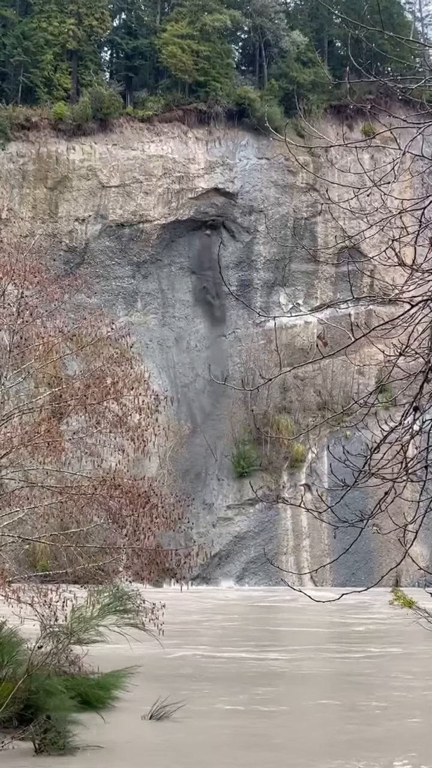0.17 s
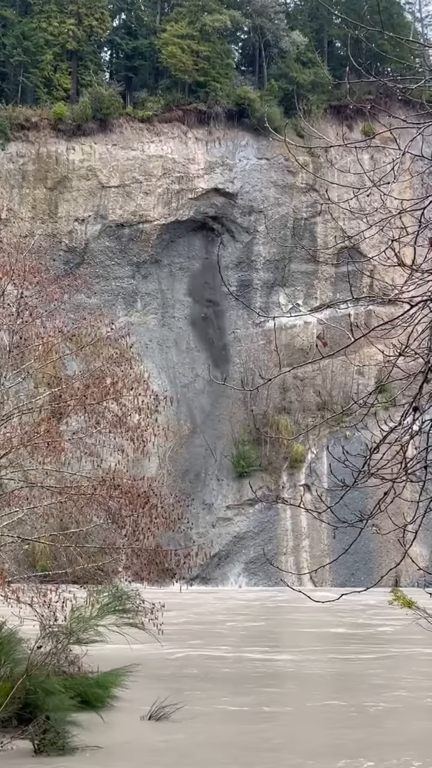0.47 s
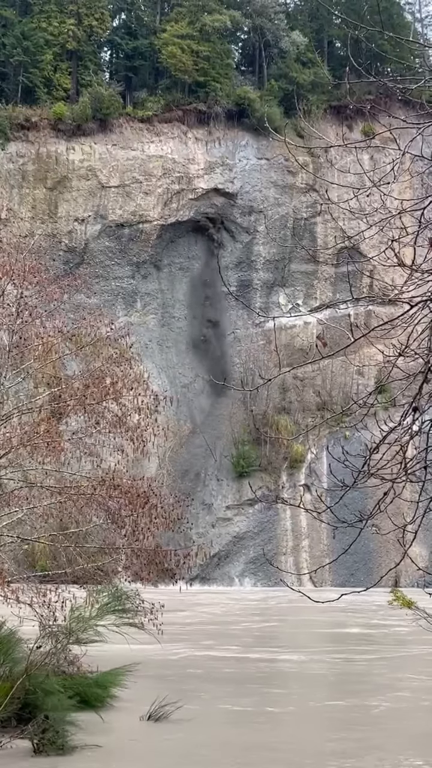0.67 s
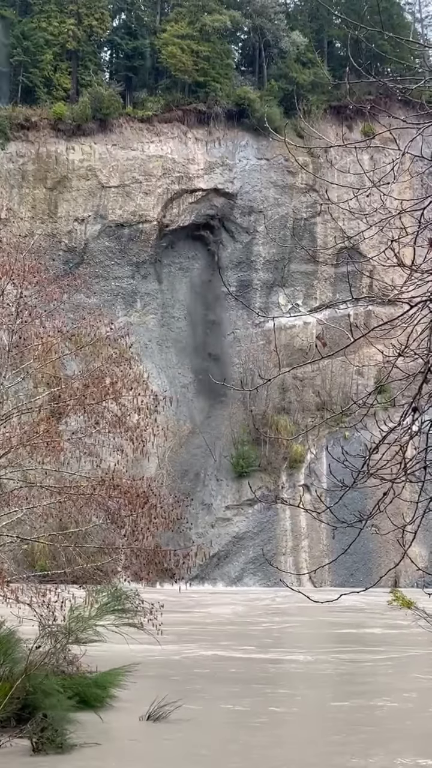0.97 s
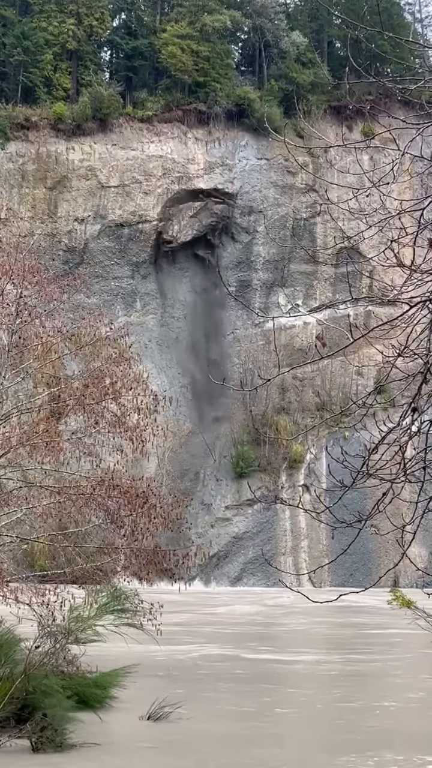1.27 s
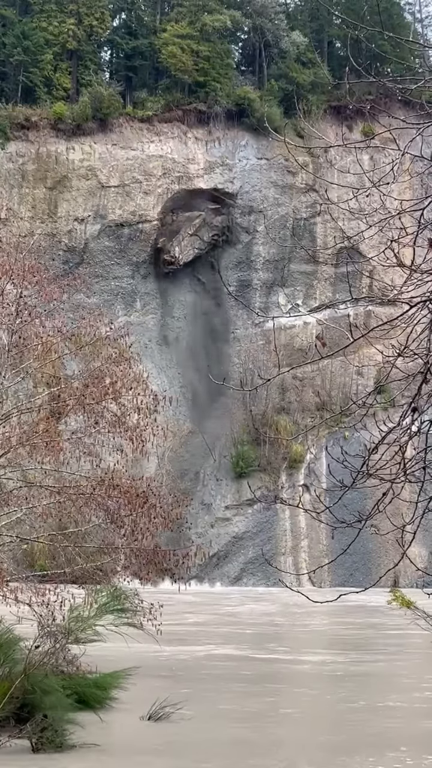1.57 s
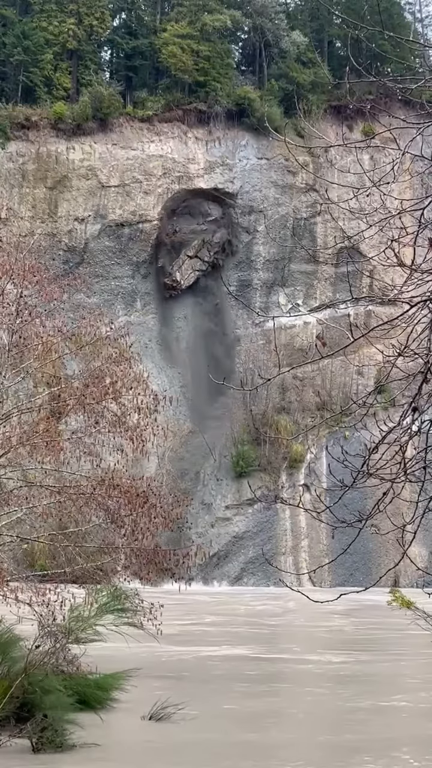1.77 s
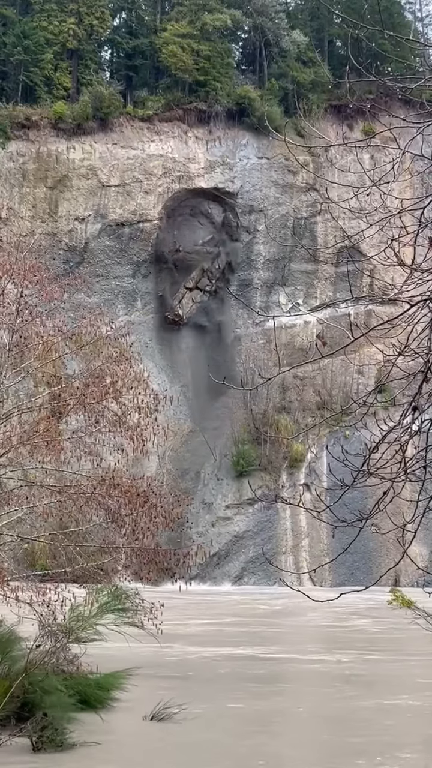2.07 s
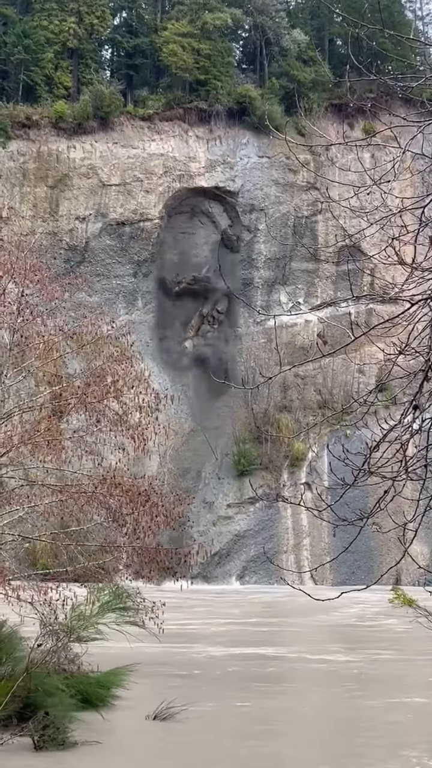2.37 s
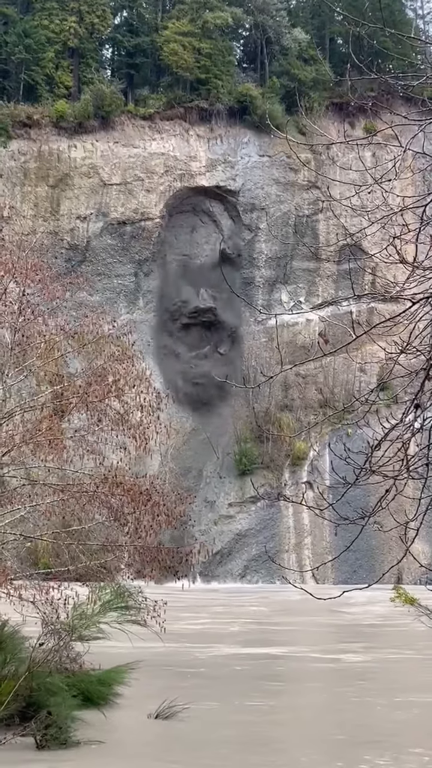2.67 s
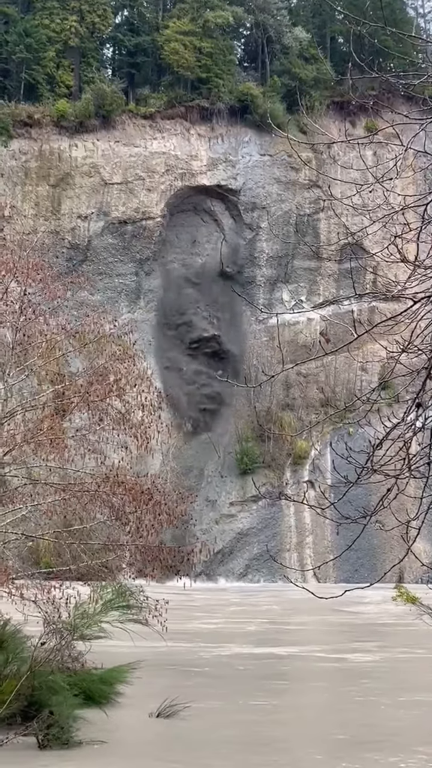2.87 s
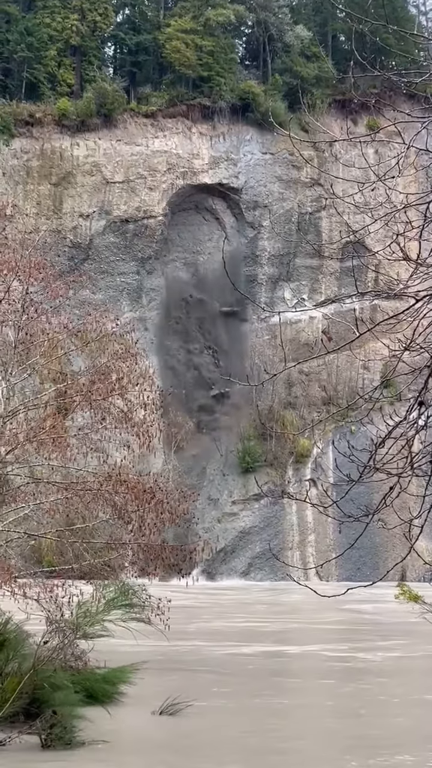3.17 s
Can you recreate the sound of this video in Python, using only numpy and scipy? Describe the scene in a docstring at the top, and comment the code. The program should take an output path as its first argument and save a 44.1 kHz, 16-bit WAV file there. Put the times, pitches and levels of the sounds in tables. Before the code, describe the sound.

A landslide on a gravel cliff, heard from the far bank: single stones clack over steady river rush, dull thuds follow at one second, then crumbling gravel and deep rumble grow until the end.

```python
"""Single stones clack over the rush of a wide river; then a slab breaks out of the gravel cliff.
It lets go with dull thuds, then crumbles into a growing rush of gravel with a deep rumble.
Heard from the far bank. River, gravel bed, grit, clods and rumble are noise shaped by spectra,
pebbles are tiny decaying rings, thuds are sagging low sines, and stones are clicks with noisy chips."""
import sys
import numpy as np
from scipy import signal
from scipy.fft import rfft, irfft
from scipy.io import wavfile
from scipy.ndimage import uniform_filter1d

SR = 44100
rng = np.random.default_rng(int(sys.argv[2]) if len(sys.argv) > 2 else 0)


def transcribe(u):
    """Save the signal u as a 16-bit wav file named by the first command-line argument.

    u: samples, shape (n,) or (channels, n), limited to [-1, 1]; the rate is SR.
    q: integer samples, one column per channel.
    """
    v = np.clip(np.atleast_2d(u).T, -1, 1)
    q = np.round(v * 32767).astype(np.int16)
    wavfile.write(sys.argv[1], SR, q)


N = 145971  # length in samples

# Spectra give relative density only: each coloured noise is brought to rms 1 before its level.
# River spectrum: frequency_hz, density_db (per Hz)
RIVER_SPECTRUM = [(20, -40), (45, -19), (75, 0.5), (140, -5), (270, -0.5), (600, -4.5), (950, -3.5),
                  (1400, -8), (2000, -9.5), (3200, -13.5), (5000, -17), (7000, -22), (10000, -32.5),
                  (14000, -40.5)]
RIVER_DB = -32.5

# Single stones striking: start_s, level_db (before the contact and chips trims), centre_hz, width_octaves
STONE_STRIKES = [(.157, -20, 1800, 1), (.166, -21.5, 2000, 0.77), (0.1743, -19.5, 2860, 0.71),
                 (0.285, -19, 1400, 0.94), (.301, -22, 1800, 0.84), (0.346, -23, 1600, 0.74),
                 (.506, -33, 4700, .3), (.602, -22, 3700, .3), (.611, -21, 3670, 0.45),
                 (.725, -22, 1890, 0.5), (0.7708, -31, 6500, 0.75), (0.773, -19, 3650, 0.6),
                 (1.028, -25, 1400, .9), (1.155, -21.5, 3400, 0.6), (1.186, -18, 2200, 0.57),
                 (1.206, -24, 4000, 0.83), (1.211, -18.5, 2400, 0.7), (1.269, -17, 2750, 0.4),
                 (1.271, -23, 2830, .55), (1.368, -23, 1800, 0.47), (1.409, -20.5, 2200, 1.3),
                 (1.586, -25, 1900, .7), (2.023, -26, 2180, .6), (2.042, -18, 1990, 0.77),
                 (2.371, -21, 1850, 0.67), (2.532, -17.5, 2600, 0.46), (2.735, -24, 2620, 0.66)]
STONE_RISE_S, STONE_DECAY_S, STONE_TAIL_S = 0.000295, 0.002, 0.011
CONTACT_DB, CHIPS_DB, STONE_TAIL_DB = -1, -6, -15

# Rumble of the moving mass of earth: frequency_hz, density_db (per Hz)
RUMBLE_SPECTRUM = [(18, -42), (30, -31), (45, -2), (62, -0.5), (85, -1), (115, -7), (160, -15),
                   (300, -20.5), (900, -53.5)]
# Weight of the moving earth: time_s, level_db
RUMBLE_LEVEL = [(0, -41.5), (.4, -54), (.91, -63), (.965, -37), (1.3, -37), (1.7, -40), (2.17, -39),
                (2.27, -30.5), (2.6, -31.5), (2.77, -31.5), (2.95, -29.5), (3.03, -26.5), (3.15, -25),
                (3.31, -25)]
# Soft clods tumbling down the face: frequency_hz, density_db (per Hz)
CLOD_SPECTRUM = [(60, -51), (130, -7), (210, -5), (330, -8), (500, -13.5), (900, -31.5), (3000, -56)]
# How many clods tumble: time_s, level_db
CLOD_LEVEL = [(0, -44), (.2, -39.5), (.6, -62), (.9, -52), (1.1, -40.5), (1.5, -36), (1.78, -40.5),
              (2.17, -34.5), (2.27, -31), (2.42, -33), (2.8, -36), (3.31, -41)]
# Heavy blocks landing: start_s, peak_db, pitch_hz (middle of the sag)
BLOCK_THUDS = [(1.027, -23, 104), (1.046, -25, 55), (1.078, -23, 86.5), (1.191, -21.5, 61), (1.48, -26, 67),
               (2.265, -25.5, 190), (2.454, -28, 90), (3.015, -23.5, 83), (3.113, -16.5, 104),
               (3.142, -22, 57.4)]
THUD_RISE_S = 0.0066
THUD_SAG = 0.11  # total pitch fall, as a share of the pitch
BURST_DB = -11  # clod burst relative to its thud

# Sliding gravel: frequency_hz, density_db (per Hz)
GRAVEL_SPECTRUM = [(60, -11), (220, -3), (500, 1), (800, -2), (1400, -0.5), (2000, 0), (3000, -2),
                   (3700, -5.5), (5500, -9), (7200, -11), (8500, -21.5), (10500, -26), (14000, -42)]
# How much gravel is moving: time_s, level_db
GRAVEL_LEVEL = [(0, -51), (.32, -43), (.5, -51), (.95, -46.5), (1.03, -34.5), (1.14, -36.5), (1.2, -31),
                (1.3, -34.5), (1.37, -33), (1.7, -35), (1.9, -34), (2.18, -31.5), (2.31, -27.8), (2.6, -28),
                (2.76, -29), (2.94, -30.5), (3.07, -24.5), (3.19, -28.5), (3.31, -26.5)]
GRAINS_PER_S = 1800  # in each row, all pitches together
GRAIN_SPREAD_DB, GRAINS_DB, HISS_DB = 4, -8.5, 0.5
# Fine grit spraying off the slide: frequency_hz, density_db (per Hz)
GRIT_SPECTRUM = [(2500, -16), (6800, 0.5), (8500, -1), (10500, -4.5), (14000, -17)]
# How much grit is in the air: time_s, level_db
GRIT_LEVEL = [(0, -68), (.88, -64), (1.0, -50), (1.22, -46.5), (1.8, -50), (2.2, -48.5), (2.48, -43.5),
              (2.9, -45.5), (3.31, -39.5)]

# Microphone pair: frequency_hz, likeness (0-1), left_minus_right_db, left_lead_rad
MICROPHONE_PAIR = [(100, 1.0, 0.0, 0.0), (220, 0.99, 0.0, 0.0), (345, 0.94, 1.3, 0.4),
                   (460, 0.92, 4.0, -0.2), (560, 0.92, 0.9, -0.3), (700, 0.84, 0.3, -0.1),
                   (950, 0.98, 0.0, 0.0), (1250, 0.89, -0.4, 0.1), (1550, 0.65, -2.4, 1.1),
                   (1640, 0.36, -1.5, 0.8), (1740, 0.75, -3.2, -1.1), (2100, 0.84, -5.1, 0.2),
                   (2350, 0.98, -0.1, 0.0), (2550, 1.0, 0, 0), (5300, 1.0, 0.0, 0.0),
                   (5700, 0.72, -0.4, -0.9), (6600, 0.64, 0.1, -0.9), (7600, 0.7, 0.1, -2.8),
                   (8100, 0.88, 0, 0), (9300, 0.85, 0, 0), (9800, 1.0, 0, 0), (13000, 0.99, 0, 0),
                   (13600, 0.73, 0.0, -0.2)]
# Narrow treble dip, and the upper band limit
DIP_HZ, DIP_WIDTH_HZ, DIP_DB = 8000, 80, -18
EDGE_HZ = 14400


def amp(db):
    """Decibels to gain."""
    return 10 ** (np.asarray(db) / 20)


def unit(x):
    """Scales to rms 1."""
    return x / np.sqrt(np.mean(x ** 2) + 1e-20)


def read(points, hz):
    """Reads a curve on a log-frequency axis."""
    f, value = np.transpose(points)
    return np.interp(np.log(hz + 1), np.log(f + 1), value)


def level(points):
    """Turns a level curve into a gain for every sample."""
    times, db = np.transpose(points)
    return amp(np.interp(np.arange(N) / SR, times, db))


def add(mix, start_s, sound):
    """Adds a sound into the mix at its time, cut off at the end."""
    part = mix[..., max(round(start_s * SR), 0):][..., :sound.shape[-1]]
    part += sound[..., :part.shape[-1]]


def colour(x, spectrum):
    """Gives a signal a spectrum, at rms 1."""
    gain = amp(read(spectrum, np.fft.rfftfreq(N, 1 / SR)))
    return unit(irfft(rfft(x) * gain, N))


def churn(patchy_db, patch_s, patch_hz, flicker_db, size=256):
    """Two unrelated noises that share drifting patches and a quick flicker across all pitches."""
    hop = size // 4
    frames, bins = N // hop + 5, size // 2 + 1
    real, imaginary = rng.standard_normal((2, 2, frames, bins))
    span = max(round(patch_s * SR / hop), 1)
    width = max(round(patch_hz * size / SR), 1)
    patches = uniform_filter1d(rng.standard_normal((frames, bins)), span, axis=0)
    patches = unit(uniform_filter1d(patches, width, axis=1))
    flicker = unit(uniform_filter1d(rng.standard_normal(frames), size=12))[:, None]
    cells = (real + 1j * imaginary) * amp(patchy_db * patches + flicker_db * flicker)
    return signal.istft(cells.transpose(0, 2, 1), nperseg=size, noverlap=size - hop)[1][:, :N]


def river():
    """The even rush of fast, wide water: gently churning noise at a fixed level."""
    water = churn(patchy_db=1.8, patch_s=0.034, patch_hz=700, flicker_db=0.5)
    return amp(RIVER_DB) * colour(water, RIVER_SPECTRUM)


def stones():
    """Each stone gives a sharp contact, a crunch of chips and a short scatter off the cliff."""
    out, t = np.zeros((2, N)), np.arange(4096) / SR
    hz = np.fft.rfftfreq(len(t), 1 / SR) + 1
    crunch = np.exp(-t / STONE_DECAY_S)
    scatter = amp(STONE_TAIL_DB) * np.exp(-t / STONE_TAIL_S)
    onset = 1 - np.exp(-(t / STONE_RISE_S) ** 2)
    shape = (crunch + scatter) * onset
    for start_s, level_db, centre_hz, octaves in STONE_STRIKES:
        band = 1 / (1 + (np.log2(hz / centre_hz) / octaves) ** 4)
        # a band-limited click, delayed by two rise times
        contact = irfft(band * np.exp(-2j * np.pi * hz * 2 * STONE_RISE_S))
        contact *= (t < t[-1] / 2) / abs(contact).max()  # drop the half that wraps round
        chips = unit(irfft(rfft(rng.standard_normal((2, len(t)))) * band))
        add(out[0], start_s, amp(level_db + CONTACT_DB) * contact)
        add(out, start_s, amp(level_db + CHIPS_DB) * shape * chips)
    return out


def thuds():
    """Heavy blocks land as low sines sagging in pitch; also returns the clod bursts they set off."""
    out, bursts = np.zeros((2, N)), np.zeros(N)
    u = np.arange(0, 10, 1 / SR / THUD_RISE_S)  # time in rise times
    for start_s, peak_db, pitch_hz in BLOCK_THUDS:
        sagging_hz = pitch_hz * (1 + THUD_SAG * (np.exp(-u / 2) - 0.5))
        turns = np.cumsum(sagging_hz) / SR
        blow = amp(peak_db) * u * np.exp(1 - u)
        add(out[0], start_s, blow * np.sin(2 * np.pi * turns))
        add(bursts, start_s, amp(BURST_DB) * blow)
    return out, bursts


def earth():
    """The mass rumbles, clods tumble, and heavy blocks land with dull thuds and burst into clods."""
    rumble = level(RUMBLE_LEVEL) * colour(rng.standard_normal((2, N)), RUMBLE_SPECTRUM)
    clods = colour(churn(patchy_db=2.3, patch_s=0.039, patch_hz=400, flicker_db=-0.55), CLOD_SPECTRUM)
    blocks, bursts = thuds()
    # tumbling and bursts add as powers
    return rumble + blocks + np.hypot(level(CLOD_LEVEL), bursts) * clods


def pebbles(count=24):
    """Countless tiny impacts at a spread of pitches, each a fast-decaying ring; a few are large."""
    t, out = np.arange(256) / SR, np.zeros((2, N))
    for hz in np.geomspace(700, 12000, count):
        size = amp(GRAIN_SPREAD_DB * np.minimum(rng.exponential(1, (2, N)), 4.5))
        struck = rng.random((2, N)) < GRAINS_PER_S / count / SR
        hits = size * struck * rng.choice([-1, 1], (2, N))
        ring = hz * np.exp(-t * hz / 0.72) * np.sin(2 * np.pi * hz * t)  # higher rings start stronger
        out += signal.oaconvolve(hits, ring[None], axes=1)[:, :N]
    return out


def grit():
    """Fine grit sprays off the slide: bright flickering noise with its own level curve."""
    spray = churn(patchy_db=1.2, patch_s=0.02, patch_hz=1500, flicker_db=1.1)
    return level(GRIT_LEVEL) * colour(spray, GRIT_SPECTRUM)


def gravel():
    """Sliding gravel hisses as churning noise and crackles with pebbles, both following its flow."""
    hiss = colour(churn(patchy_db=1.36, patch_s=0.022, patch_hz=1000, flicker_db=0.5), GRAVEL_SPECTRUM)
    crackle = colour(pebbles(), GRAVEL_SPECTRUM)
    return level(GRAVEL_LEVEL) * (amp(HISS_DB) * hiss + amp(GRAINS_DB) * crackle)


def microphones(field):
    """The first row reaches both microphones alike, the second in opposite sign, as far as they differ."""
    hz, pair = np.fft.rfftfreq(N, 1 / SR), np.array(MICROPHONE_PAIR)
    likeness, balance_db, lead_rad = (read(np.c_[pair[:, 0], column], hz) for column in pair.T[1:])
    likeness = np.clip(likeness, 0, 1)
    common, apart = rfft(field) * np.sqrt([(1 + likeness) / 2, (1 - likeness) / 2])
    tilt = amp(balance_db / 2) * np.exp(0.5j * lead_rad)  # half on each side
    left, right = (common + apart) * tilt, (common - apart) / tilt
    return irfft(np.array([left, right]), N)


def scene():
    """River and landslide, heard from the far bank."""
    return microphones(river() + stones() + earth() + gravel() + grit())


def record(dry):
    """A narrow dip in the treble, then a low-pass band limit."""
    hz = np.fft.rfftfreq(N, 1 / SR)
    dip = amp(DIP_DB * np.exp(-((hz - DIP_HZ) / DIP_WIDTH_HZ) ** 2))
    dipped = irfft(rfft(dry) * dip, N)
    low_pass = signal.firwin(255, EDGE_HZ, window=("kaiser", 9), fs=SR)
    return signal.oaconvolve(dipped, low_pass[None], "same")


dry = scene()
out = record(dry)
transcribe(out)
```